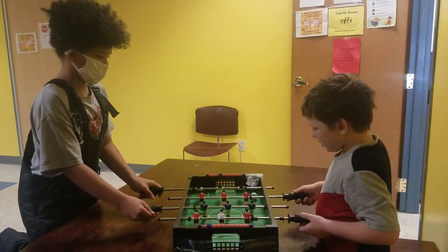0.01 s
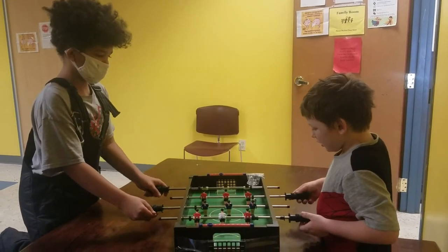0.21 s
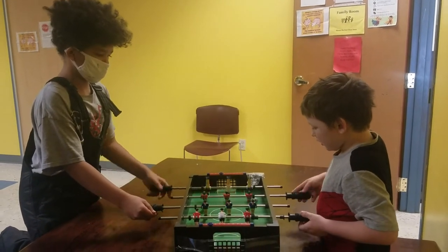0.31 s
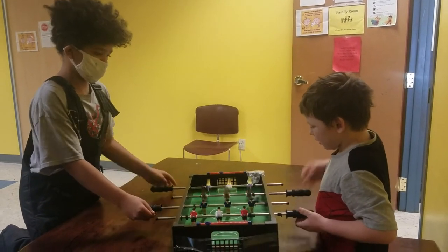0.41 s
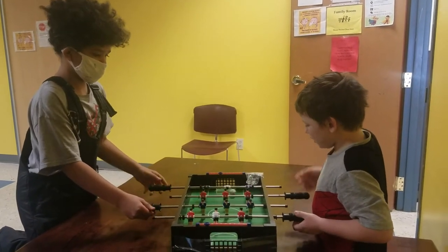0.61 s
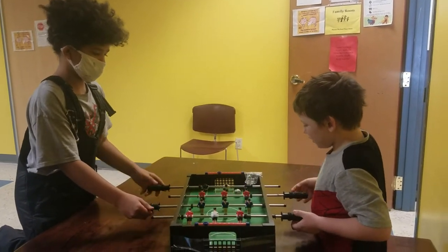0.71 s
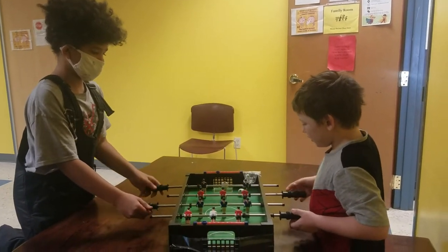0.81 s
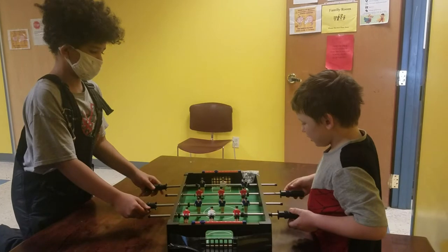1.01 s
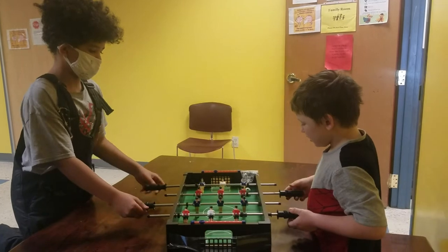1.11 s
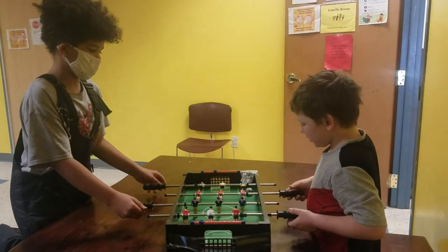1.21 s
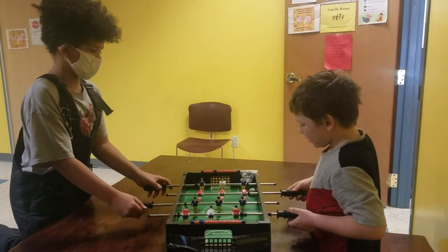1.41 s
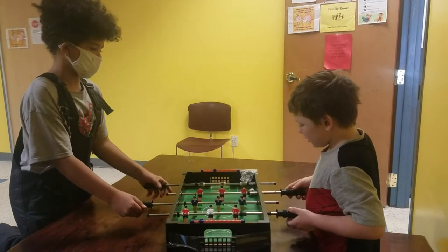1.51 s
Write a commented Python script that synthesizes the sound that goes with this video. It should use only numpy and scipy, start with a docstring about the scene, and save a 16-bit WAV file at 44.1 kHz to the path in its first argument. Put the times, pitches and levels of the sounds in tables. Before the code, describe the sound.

A small tabletop football game in a bare, lightly echoing room. The ball rumbles and hops on the hollow playfield from the start. From 0.17 to 0.51 seconds, plastic and steel rods clack rapidly, hardest near 0.37 with a table-ringing slam and bright pings. Ball taps follow at 0.6-0.9, then faint bumps around 1.0, a slight rod slide near 1.27, and light knocks at 1.4-1.52.

```python
"""A bare room, a small tabletop football game, two microphones. Over faint room air the ball,
resonances shaken by noise, rumbles and hops on the hollow playfield. Plastic men clack and steel
rods bang into their stops: banded noise bursts with room tails, plus ringing cabinet and rod modes.
One slam also rings the table. Decaying sines make the pings and the thumps and cracks of the hits;
shaped hiss makes the sliding rods, and damped low pushes with dry ticks the bumps of a handle."""
import sys
import numpy as np
from scipy import signal
from scipy.fft import irfft
from scipy.io import wavfile

SR = 44100
rng = np.random.default_rng(int(sys.argv[2]) if len(sys.argv) > 2 else 0)


def to_wav(sig):
    """Store sig (one row per channel, or 1-D mono) as 16-bit WAV at the path in sys.argv[1].

    Samples outside -1..1 are clipped; the rate is SR.
    """
    pcm = np.clip(np.atleast_2d(sig), -1, 1) * 32767
    pcm = np.round(pcm).astype(np.int16)
    wavfile.write(sys.argv[1], SR, pcm.T)  # frames by channels


N = 70560  # samples, 1.6 s
RING = np.arange(36000) / SR  # time axis of one event, s

# In every table and setting a positive left-right level is louder on the left.
# likeness of the two microphones: f/Hz, correlation
LIKENESS = [(60, 1), (250, 0.89), (500, 0.93), (1000, 0.44), (2500, 0.019), (8000, 0), (14000, 0.14)]
# treble balance of the two microphones: f/Hz, left-right level/dB
MIC_BALANCE = [(1000, 0.5), (2000, 1), (5500, -7), (9000, -0.5), (14000, 4.5)]
BASS_PAN = 0.98  # share of the left-right level that the low parts take
RECORDER_TOP_HZ = 15900

# background air of the room: f/Hz, level/dB per Hz
AIR_COLOUR = [(15, -2), (28, -37), (42, -8.5), (60, 3), (85, -3.5), (280, -16.5), (400, -5), (800, -31),
              (1600, -24.5), (5000, -33), (7500, -43), (16000, -34)]
AIR_DB = -53.5

# rods sliding in their bearings: t/s, length/s, level/dB, left-right level/dB
SLIDES = [(1.257, 0.037, -55, -20), (1.289, 0.037, -51, -22)]
# colour of the sliding hiss: f/Hz, level/dB per Hz
SLIDE_COLOUR = [(500, 11.5), (1400, 6), (3000, 2), (7000, -14), (11000, -1.5), (16000, -13)]
# one rod singing as it slides, a single row: t/s, length/s, f/Hz, level/dB
ROD_SONG = (1.11, .16, 5200, -70)
SONG_WIDTH_HZ = 320  # of each of two resonances in a row

# dry bumps of a handle on the cabinet: t/s, push level/dB, tick level/dB, tick left-right level/dB
BUMPS = [(1.4063, -29.5, -45.5, -16), (1.297, -41, -57, -20)]
# colour of the tick: f/Hz, level/dB per Hz
TICK_COLOUR = [(1000, 6), (4000, 0), (16000, -2)]
PUSH_HZ, PUSH_S, TICK_S = 95, 0.0058, 0.0025

# modes of the table under the game: f/Hz, level/dB, t60/s
TABLE_MODES = [(120.9, -15, 0.55), (238.1, -22.5, 0.63), (316, -26, 0.74), (417.8, -18, 0.39),
               (515, -28, 0.68), (872, -27.5, 0.59), (951, -22, 0.48)]
SLAM_S, TABLE_RISE_S = 0.3685, 0.024

# pings of steel parts, each at its own pitch: t/s, f/Hz, level/dB
PINGS = [(0.1744, 4530, -37), (0.1738, 5970, -40), (.266, 3950, -35), (0.264, 4740, -31),
         (.369, 5184, -24.5), (.5, 4520, -31), (.5, 5020, -35.5), (.694, 6330, -60)]
PING_T60_S, PING_SPLIT_HZ = 0.15, 38

# resonances of the hollow playfield: f/Hz, width/Hz, level/dB
PLAYFIELD = [(357.7, 33, 0.5), (643.5, 25.8, 0), (883, 51, -7.5), (1175, 85, -22)]
# rolling ball: t/s, level/dB
ROLL = [(0, -48), (.15, -43.5), (.6, -42), (.8, -55), (1, -60), (1.15, -59.5), (1.23, -66), (1.4, -55.5),
        (1.5, -54.5), (1.6, -94)]
# hops of the ball: t/s, level/dB
HOPS = [(0, -42), (0.033, -43), (0.072, -44), (0.105, -44), (0.611, -49), (.644, -44), (0.697, -37.5),
        (0.759, -40.5), (.874, -48)]
HOP_RISE_S, HOP_GRIT, HOP_TILT_DB_PER_OCTAVE = 0.0019, 0.18, 7.5

# short damped resonances of the hits, from low thumps to sharp cracks: t/s, f/Hz, level/dB, rise/s
HIT_RESONANCES = [(0.2157, 1217, -30.5, 0.0042), (.2205, 539, -28, 0.0035), (0.2823, 1400, -18, 0.00079),
                  (.2803, 3330, -14.5, 0.00076), (.369, 133, -12.5, 0.0059), (.381, 327, -16, 0.0097),
                  (0.4395, 1472, -20, 0.0024), (1.46, 1290, -39.5, 0.0025)]
HIT_LAG_S, HIT_PAN_DB = 0.0001, -2.5

# knocks of rods, men and ball: t/s, then level/dB of thud, body, clack, click and edge,
# then left-right level/dB
KNOCKS = [(0.1726, -40, -39, -42, -30.5, -33.5, -1.5), (0.2162, -33, -26.5, -24.5, -36, -70, -0.5),
          (0.2626, -28, -61, -23.5, -26.5, -23, -3.5), (0.2807, -33, -28.5, -19.5, -26, -86, -2),
          (0.3545, -36, -27.5, -31, -28, -27.5, 0.5), (0.368, -21, -23, -18.5, -24, -17.5, -1.5),
          (0.3758, -21.5, -15, -28, -12.5, -27, -1.5), (0.3864, -24, -20, -14, -25.5, -29.5, 1),
          (.415, -26.5, -20.5, -23.5, -42, -44, -13), (0.4394, -31, -28.5, -18.5, -41, -34, -6),
          (0.4997, -28, -26.5, -27, -29, -23, -2.5), (0.5105, -35.5, -21.5, -59, -55, -55, 0.5),
          (.694, -45.5, -44, -47.5, -53, -88, -3), (0.816, -55, -52, -51, -65.5, -79, 0),
          (0.8912, -46, -50.5, -53, -63.5, -101, -2), (1.0183, -37.5, -44, -49.5, -48.5, -52.5, -2),
          (1.05, -37, -44.5, -62, -69, -78, -2), (1.266, -87, -51.5, -53.5, -75, -74, -5),
          (1.299, -43, -50.5, -51, -60, -79, -3.5), (1.43, -34, -39.5, -66, -55.5, -75, -3),
          (1.4581, -45.5, -55, -37.5, -40.5, -37.5, -0.5), (1.473, -35, -33.5, -48, -35, -82, -2),
          (1.5228, -43.5, -39.5, -42, -40, -46, -3)]
# places of those five parts in the spectrum: f/Hz
PART_HZ = [160, 450, 1600, 5800, 13000]
# only heavy knocks move the table: the deep boom falls faster than the thud, in dB per dB
BOOM_HZ, FULL_THUD_DB, BOOM_LOSS = 92, -19.5, 0.66
# colour of the plastic: f/Hz, level/dB
PLASTIC_COLOUR = [(30, -33), (70, -24), (110, 1), (180, 1.5), (350, 2.5), (900, 2), (1150, -1), (1450, -5),
                  (2500, -1.5), (4100, -5), (5000, 1.5), (6400, 2), (7300, -5), (10500, 0), (12800, -4),
                  (15300, 1)]
# decay of the cabinet rattle: f/Hz, t60/s
RATTLE_T60 = [(100, 0.027), (450, 0.015), (1800, 0.084), (6000, 0.069), (14000, 0.022)]
# decay of the room: f/Hz, t60/s (read only at octave centres, where it stays above zero)
ROOM_T60 = [(100, 0.69), (500, 0.28), (2000, 0.5), (5500, 0.7731), (9000, -0.0364), (15000, 0.1569)]
# room at the start of its tail: f/Hz, level/dB
ROOM_LEVEL = [(100, -10), (500, -7), (2000, -12), (5500, -12.5), (14000, -9.5)]
ROOM_RISE_S, CONTACT_S = 0.0026, 0.00034
RISE_CYCLES = 0.37  # the attack lengthens toward the bass
# random narrow peaks and dips vary the rattle's colour from knock to knock
PEAK_DEPTH_DB, PEAK_SPACING_HZ = 2.8, 130
# the rattle comes in lumps
LUMP_DEPTH_DB, LUMP_S = 4.8, 0.0016
# modes of the cabinet: f/Hz, level/dB, t60/s
CABINET_MODES = [(89.3, -7, 0.8), (148.4, -0.5, 0.28), (176.1, -9.5, 0.32), (358.4, -11.5, 0.69),
                 (489.7, -12.5, 0.46), (629.2, -11.5, 0.34), (802, -9.5, 0.3), (1423, -10.5, 0.16)]
# steel rod modes: f/Hz, level/dB, t60/s
ROD_MODES = [(2450, -27, 0.7), (2617, -25, 0.71), (3055, -13, 0.18), (4894, -20, 0.45), (4880, -43, 0.93),
             (6130, -21.5, 0.26)]
ROD_FLAT, ROD_SHARP = -0.01672, 0.022  # limits of the pitch shift, as a share of the pitch


def amp(db):
    """Decibels to gain."""
    return 10 ** (np.asarray(db) / 20)


def evened(x):
    """Scales to rms 1."""
    return x / np.sqrt(np.mean(x ** 2) + 1e-20)


def read(points, hz):
    """Reads a table along a log-frequency axis."""
    f, value = np.transpose(points)
    return np.interp(np.log(hz + 1), np.log(f + 1), value)


def sides(pan_db):
    """Left and right gains of unit mean power."""
    return evened(amp([[pan_db / 2], [-pan_db / 2]]))


def add(mix, s, sound):
    """Mixes a stereo sound in at time s, cut off at the end of the mix."""
    part = mix[:, max(round(s * SR), 0):][:, :sound.shape[1]]
    part += sound[:, :part.shape[1]]


def fade(t60):
    """Falls by 60 dB in t60 seconds."""
    return np.exp(-np.log(1000) * RING / t60)


def arch(start, length):
    """A smooth swell and fall."""
    return np.sin(np.pi * np.clip((np.arange(N) / SR - start) / length, 0, 1))


def resonate(x, hz, width_hz):
    """One resonance, of gain 1 at its peak."""
    return signal.lfilter(*signal.iirpeak(hz, hz / width_hz, SR), x)


def phase_spread(hz):
    """Angle between the two microphones that gives their likeness at hz."""
    return np.arccos(np.clip(read(LIKENESS, hz), -1, 1))


def noise_spectrum(size):
    """Random-phase stereo spectrum, alike on both sides in the bass."""
    hz = np.fft.rfftfreq(size, 1 / SR)
    a, b = np.exp(2j * np.pi * rng.random((2, len(hz))))
    angle = phase_spread(hz) / 2
    shared, opposed = a * np.cos(angle), b * np.sin(angle)
    return hz, np.array([shared + opposed, shared - opposed])


def noise(colour):
    """Steady stereo noise of a given colour."""
    hz, z = noise_spectrum(N)
    return evened(irfft(z * amp(read(colour, hz)), N))


def room_air(pan_db=-4):
    """The quiet background of the room is steady coloured noise."""
    return amp(AIR_DB) * noise(AIR_COLOUR) * sides(pan_db)


def sliding():
    """Rods hiss through their bearings; two resonances in a row make one sing faintly."""
    hiss = noise(SLIDE_COLOUR)
    s, length, hz, db = ROD_SONG
    tone = resonate(resonate(hiss, hz, SONG_WIDTH_HZ), hz, SONG_WIDTH_HZ)
    out = amp(db) * arch(s, length) * evened(tone)
    for s, length, db, pan_db in SLIDES:
        out += hiss * amp(db) * sides(pan_db) * arch(s, length)
    return out


def bumps():
    """A handle on the cabinet gives a damped low push and a small dry tick."""
    out = np.zeros((2, N))
    for s, push_db, tick_db, pan_db in BUMPS:
        push_shape = RING / PUSH_S * np.exp(1 - RING / PUSH_S)
        push = -push_shape * np.sin(2 * np.pi * PUSH_HZ * RING)
        tick_shape = RING / TICK_S * np.exp(1 - (RING / TICK_S) ** 2)
        tick = tick_shape * noise(TICK_COLOUR)[:, :len(RING)]
        add(out, s, amp(push_db) * push * sides(pan_db * BASS_PAN))
        add(out, s, amp(tick_db) * tick * sides(pan_db))
    return out


def table(pan_db=-2):
    """The hardest slam rocks the wooden table, whose modes swell and then die away."""
    out = np.zeros((2, N))
    for hz, db, t60 in TABLE_MODES:
        ring = fade(t60) * (1 - np.exp(-RING / TABLE_RISE_S))
        add(out, SLAM_S, amp(db) * sides(pan_db) * ring * np.sin(2 * np.pi * hz * RING))
    return out


def pings(pan_db=-3, twin=0.99):
    """Steel rings with a close, beating pair of modes."""
    out = np.zeros((2, N))
    for s, hz, db in PINGS:
        a, b = 2 * np.pi * rng.random((2, 2, 1))  # separate phases at each microphone
        lower = np.sin(2 * np.pi * hz * RING + a)
        upper = np.sin(2 * np.pi * (hz + PING_SPLIT_HZ) * RING + b)
        add(out, s, amp(db) * sides(pan_db) * (lower + twin * upper) * fade(PING_T60_S))
    return out


def ball(pan_db=-2, top_hz=1700):
    """Rolling grit, a low-passed noise, shakes the resonances of the playfield."""
    level = amp(np.interp(np.arange(N) / SR, *np.transpose(ROLL)))
    lowpass = signal.butter(2, top_hz, fs=SR, output="sos")
    grit = signal.sosfilt(lowpass, irfft(noise_spectrum(N)[1], N))
    drive = np.array([grit, grit * level])
    # the steady roll only sets the scale of the shaken one
    steady, shaken = sum(amp(db) * resonate(drive, hz, width) for hz, width, db in PLAYFIELD)
    return shaken / steady.std() * sides(pan_db)


def hops(pan_db=-2):
    """Each hop of the ball rings the playfield with a hollow, slightly gritty tok."""
    out = np.zeros((2, N))
    for s, hop_db in HOPS:
        for hz, width, db in PLAYFIELD:
            grit = evened(resonate(irfft(noise_spectrum(len(RING))[1]), hz, hz / 2))
            ring = (1 - np.exp(-RING / HOP_RISE_S)) * np.exp(-np.pi * width * RING)
            tilt_db = HOP_TILT_DB_PER_OCTAVE * np.log2(hz / PLAYFIELD[0][0])
            tok = np.sin(2 * np.pi * hz * RING) + HOP_GRIT * grit
            add(out, s, amp(hop_db + db + tilt_db) * sides(pan_db) * ring * tok)
    return out


def hit_resonances():
    """Short damped resonances, low thumps to sharp cracks, reach the right microphone a little later."""
    out = np.zeros((2, N))
    for s, hz, db, rise_s in HIT_RESONANCES:
        t = np.maximum(RING - np.array([[0], [HIT_LAG_S]]), 0)
        shape = t / rise_s * np.exp(1 - t / rise_s)
        add(out, s, amp(db) * sides(HIT_PAN_DB) * shape * np.sin(2 * np.pi * hz * t))
    return out


def random_peaks(hz):
    """Random narrow peaks and dips of unit power, shallower below 2 kHz."""
    grid = np.arange(0, SR / 2, PEAK_SPACING_HZ)
    heights = np.interp(hz, grid, rng.standard_normal(len(grid)))
    return evened(amp(PEAK_DEPTH_DB * heights * np.minimum(hz / 2000, 1)))


def lumps():
    """Uneven chatter of loose parts, of unit power."""
    grid = np.arange(0, RING[-1], LUMP_S)
    heights = np.clip(rng.standard_normal(len(grid)), -2, 2)
    return evened(amp(LUMP_DEPTH_DB * np.interp(RING, grid, heights)))


def rattle(force, pan_db):
    """A dense plastic rattle and its room tail, octave by octave."""
    hz, z = noise_spectrum(len(RING))
    colour = amp(read(PLASTIC_COLOUR, hz)) * random_peaks(hz)
    room_swell, chatter = 1 - np.exp(-RING / ROOM_RISE_S), lumps()
    out = np.zeros((2, len(RING)))
    for centre in 55 * 2. ** np.arange(9):
        octaves_off = np.clip(np.log2((hz + 1) / centre), -1, 1)
        band = np.cos(np.pi / 2 * octaves_off) ** 2
        # the scale gives the band unit power before its colour
        grain = irfft(z * band * colour) * len(RING) / np.sqrt(2 * np.sum(band ** 2))
        direct = fade(read(RATTLE_T60, centre)) * (chatter if centre > 1000 else 1)
        room = amp(read(ROOM_LEVEL, centre)) * room_swell * fade(read(ROOM_T60, centre))
        attack = 1 - np.exp(-RING / (CONTACT_S + RISE_CYCLES / centre))
        shape = np.hypot(direct, room) * attack
        pan = read(MIC_BALANCE, centre) + pan_db * (1 if centre > 2500 else BASS_PAN)
        out += amp(read(force, centre)) * sides(pan) * shape * grain
    return out


def modes(force, pan_db):
    """The cabinet always rings at the same pitches; the rods differ slightly from knock to knock."""
    out = np.zeros((2, len(RING)))
    rods = [(hz * (1 + rng.uniform(ROD_FLAT, ROD_SHARP)), db, t60) for hz, db, t60 in ROD_MODES]
    for hz, db, t60 in CABINET_MODES + rods:
        phase = phase_spread(hz) * rng.choice([-1, 1]) * np.array([[.5], [-.5]])
        ring = fade(t60) * (1 - np.exp(-RING * hz / RISE_CYCLES))
        out += amp(db + read(force, hz)) * ring * np.sin(2 * np.pi * hz * RING + phase)
    return out * sides(pan_db * BASS_PAN)


def knocks():
    """Every knock shares the same cabinet; hard contacts are bright, heavy ones boom."""
    out = np.zeros((2, N))
    for s, *parts_db, pan_db in KNOCKS:
        thud_db = parts_db[0]
        boom_db = thud_db + BOOM_LOSS * min(thud_db - FULL_THUD_DB, 0)
        force = [(BOOM_HZ, boom_db), *zip(PART_HZ, parts_db)]
        add(out, s, rattle(force, pan_db) + modes(force, pan_db))
    return out


def scene():
    """The game over the quiet background of the room."""
    background = room_air() + sliding() + bumps() + table()
    return background + pings() + ball() + hops() + hit_resonances() + knocks()


def record(dry):
    """The band limit of the recorder, a steep low-pass."""
    lowpass = signal.firwin(511, RECORDER_TOP_HZ, window=("kaiser", 9), fs=SR)
    return signal.oaconvolve(dry, lowpass[None], "same")


dry = scene()
out = record(dry)
to_wav(out)
```